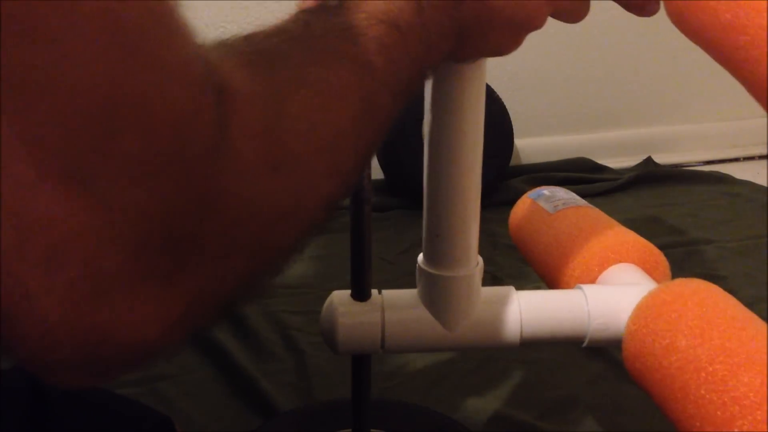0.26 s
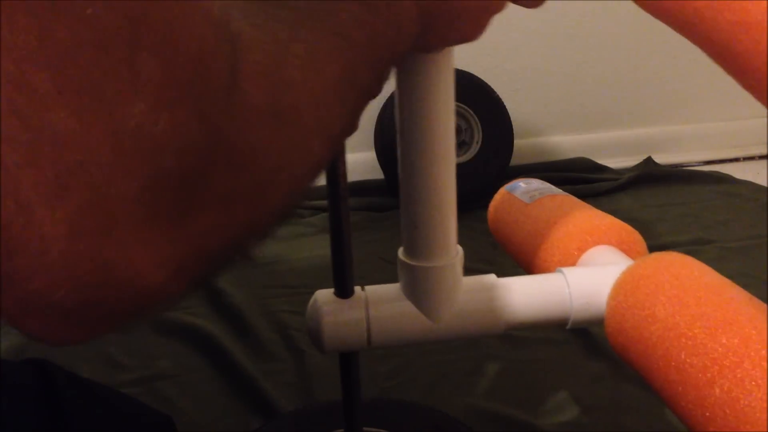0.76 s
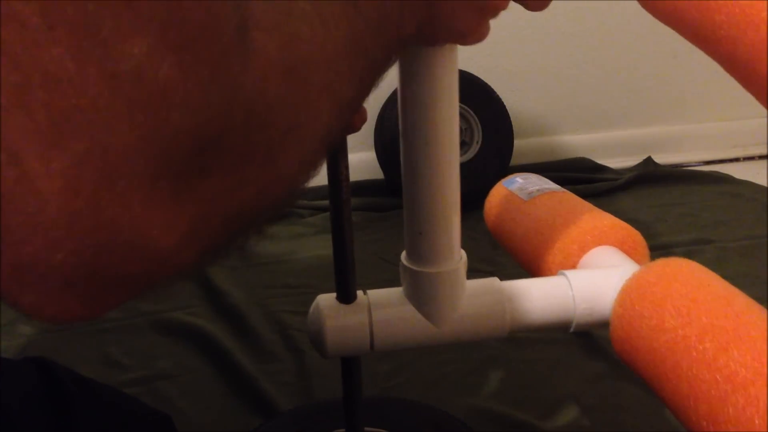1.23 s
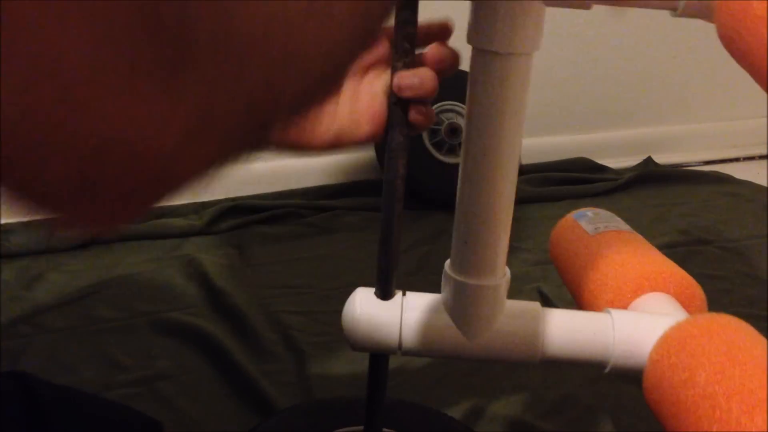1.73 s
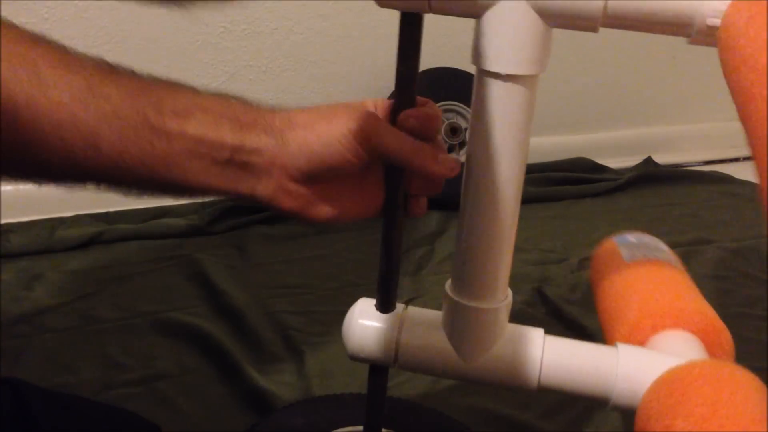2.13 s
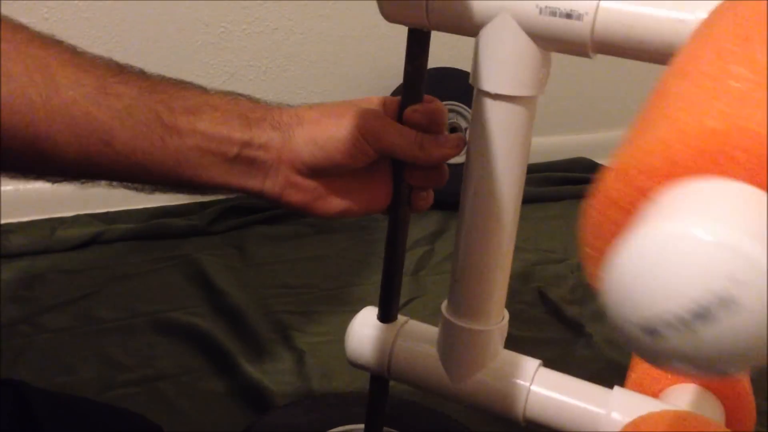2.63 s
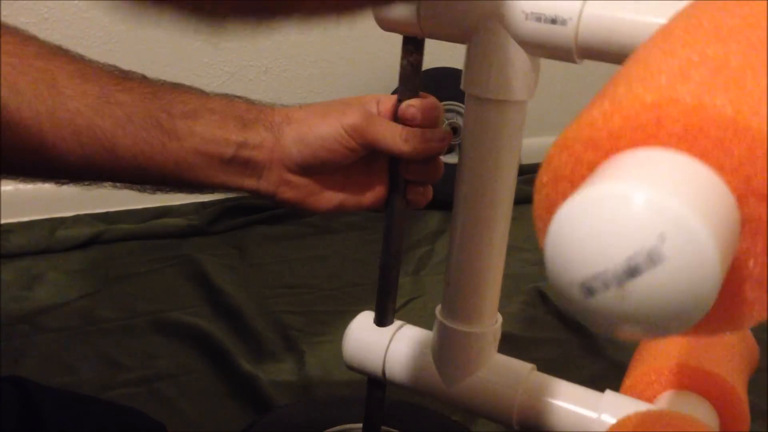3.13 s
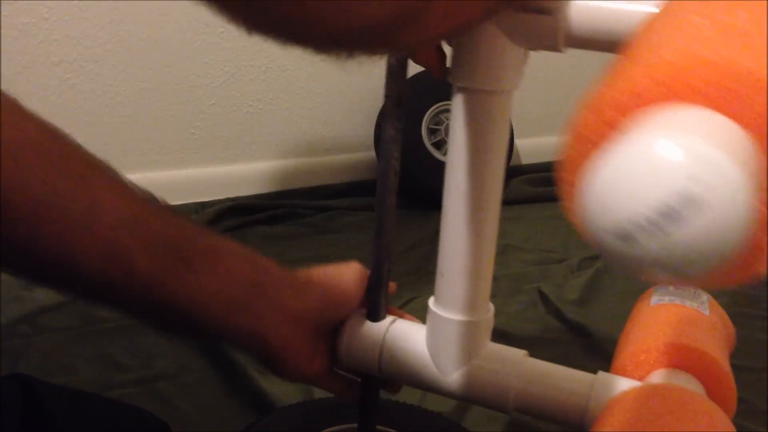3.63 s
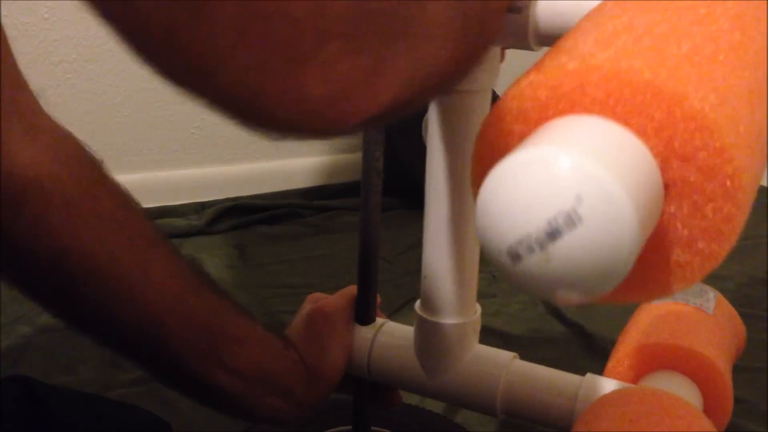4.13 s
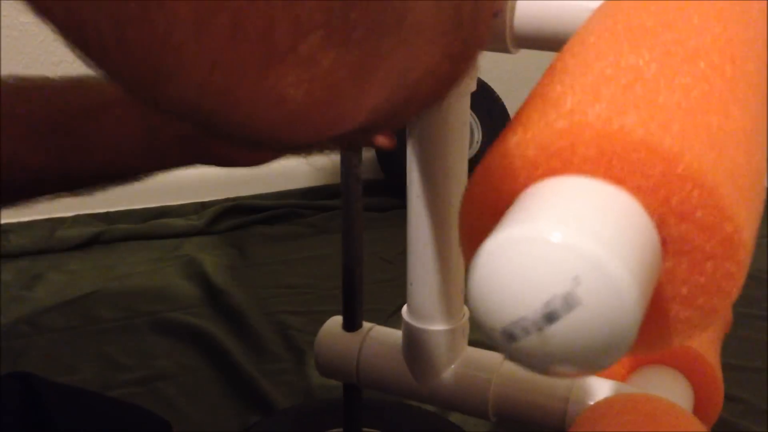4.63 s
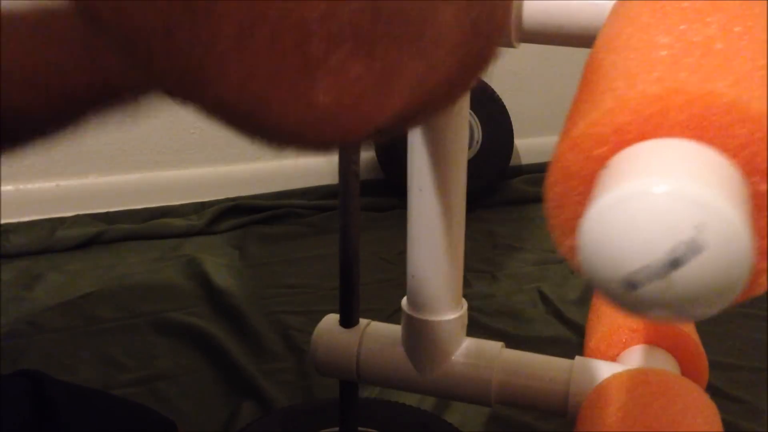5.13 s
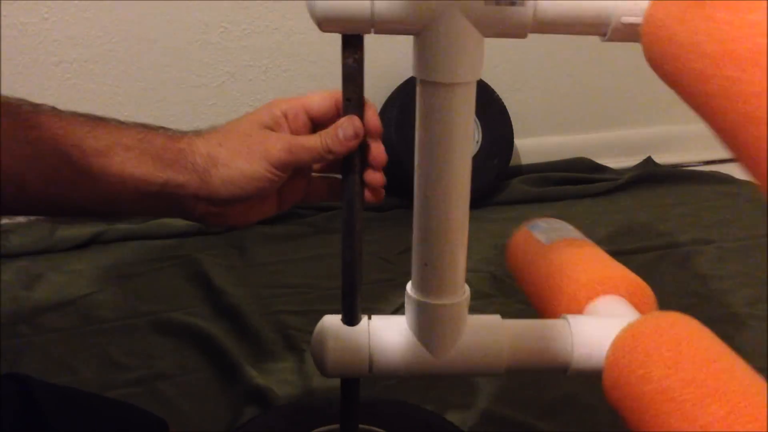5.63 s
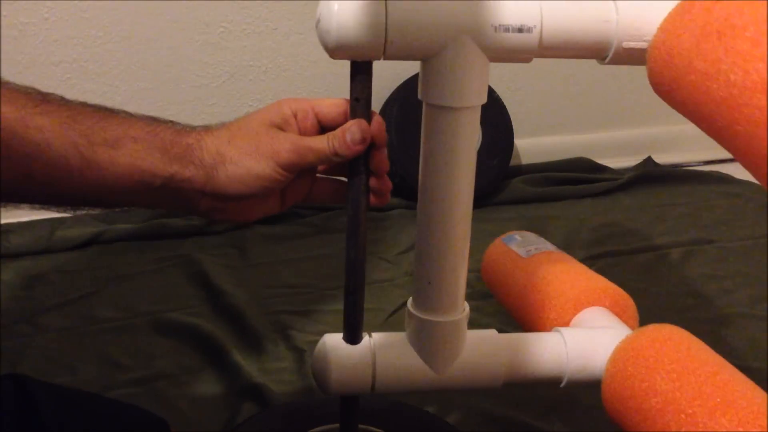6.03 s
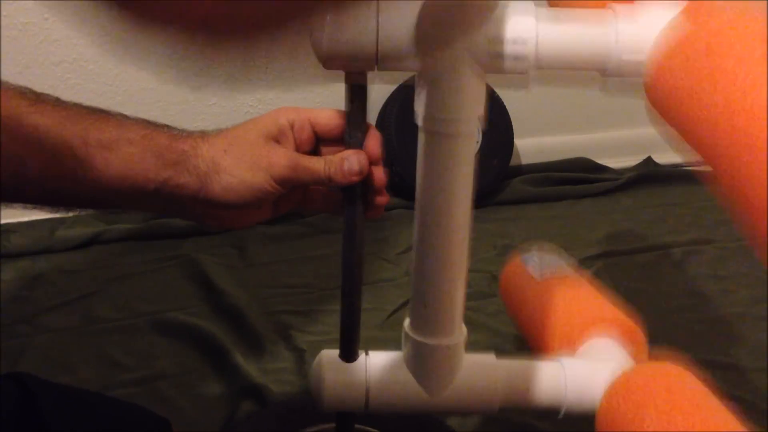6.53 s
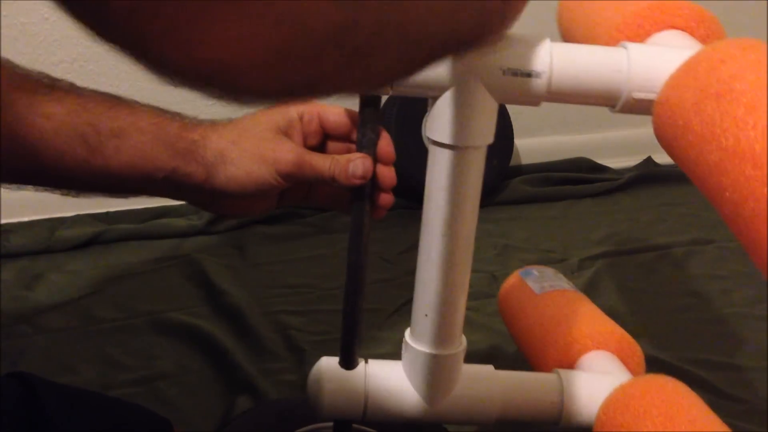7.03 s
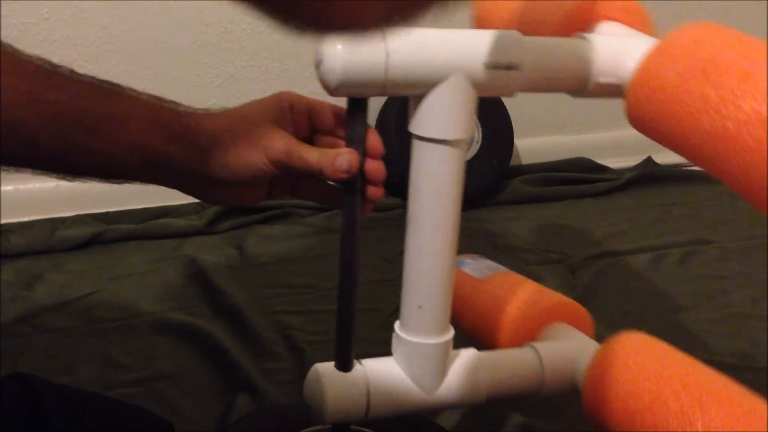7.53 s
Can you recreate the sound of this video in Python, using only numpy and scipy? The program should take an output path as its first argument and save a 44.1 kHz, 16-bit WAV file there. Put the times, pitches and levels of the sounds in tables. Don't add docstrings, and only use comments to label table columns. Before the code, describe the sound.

Hollow plastic pipes struck by hand knock and ring as a metal rod cracks sharply in its hole, with rattles in a small room.

```python
import sys
import numpy as np
from scipy import signal
from scipy.fft import rfft, irfft, next_fast_len
from scipy.io import wavfile

SR = 44100
rng = np.random.default_rng(int(sys.argv[2]) if len(sys.argv) > 2 else 0)


def volts(x):
    e = np.asarray(x, float) / 20
    return 10 ** e


def dump(signal):
    limited = np.clip(np.atleast_2d(signal).T, -1, 1)
    pcm = np.round(limited * 32767).astype(np.int16)
    wavfile.write(sys.argv[1], SR, pcm)


N = 342657


def at_hz(points, hz):
    return np.interp(np.log(hz), np.log(np.array(points)[:, 0]), np.array(points)[:, 1])


def rms_one(x):
    return x / np.sqrt(np.mean(x ** 2) + 1e-20)


def add(track, start_s, sound):
    i = round(start_s * SR)
    track[i:i + len(sound)] += sound[:N - i]


def ring(clicks, hz, t60):
    radius, turn = volts(-60 / (t60 * SR)), 2 * np.pi * hz / SR
    feedback = [1, -2 * radius * np.cos(turn), radius * radius]
    return signal.lfilter([0, np.sin(turn)], feedback, clicks + 1e-18)


# start_s, level_db (peak of the long pipes), cross_piece_db and short_arm_db (against
# the long pipes), hardness_db
BLOWS = [
    (2.225, -9, -13.5, -0.5, -1.5),
    (2.604, -14.5, -2.5, -4.5, -8),
    (3.059, -15, -7, -8.5, -8),
    (5.82, -17, -0.5, 1, -0.5),
    (6.238, -14, 0, -16, -5),
    (6.688, -17, -18.5, -11, -6.5),
    (7.065, -19.5, 2, -6.5, -1),
    (7.463, -19.5, -4, -9.5, 1),
]
REBOUNDS = [
    (2.243, -14.5, -12, -11, -3),
    (5.828, -15, 4, -6.5, -10),
    (6.249, -18.5, 0, -9.5, -17),
    (6.7, -29.5, -2.5, -6, -17),
    (6.731, -29, -21, 0, -8),
    (6.741, -27.5, 7, 0, -10.5),
    (6.75, -38, 8, -7, -20),
]
# pitch_hz of deep, long pipes, cross piece, short arm, wall, hardness
BLOW_HZ = [200, 290, 450, 620, 1200, 2400]
# pitch_hz, level_db, t60_s
PIPE_TONES = [(141.1, -25.5, 0.04), (190, -20.5, 0.046), (235, -8.5, 0.25), (285, -2.5, .06), (320.6, 0, 0.11),
              (358.8, 2.5, .06), (446.5, 0.5, 0.071), (520, 1, 0.11), (610, 4, 0.12), (705.4, 0.5, 0.08),
              (844, 4, .04), (983.3, 1.5, 0.08), (1186.4, -2, 0.11), (1370, -4, 0.068), (1460, 0, .04),
         (1610, -4, .03), (1790, -3.5, 0.034), (1912, -3.5, 0.024), (2325, -1, 0.03), (2587, -4, 0.06),
         (3137, -14, .015)]


def pipes(level_db, spread_db, blur):
    blow_wall_db, rebound_wall_db = -7, 7
    far_dull_hz = 4000
    tones = PIPE_TONES
    hits = [(*b, blow_wall_db) for b in BLOWS] + [(*r, rebound_wall_db) for r in REBOUNDS]
    rows, near, far = np.array(hits), np.zeros(N), np.zeros(N)
    start_s, peak_db = rows[:, 0], rows[:, 1]
    luck = rng.standard_normal((len(rows), len(tones)))
    signs = rng.choice([-1, 1], luck.shape)
    deep_db = np.interp(start_s, *np.transpose(RATTLES)[[0, 2]])
    for k, (hz, tone_db, t60) in enumerate(tones):
        colour_db = []
        for (_, _, cross, arm, hard, wall), deep in zip(rows, deep_db):
            colours = [deep, 0, cross, arm, hard + wall, hard]
            colour_db.append(np.interp(np.log(hz), np.log(BLOW_HZ), colours))
        at = ((start_s + .4 / hz) * SR).astype(int)
        clicks = np.zeros(N)
        clicks[at] = signs[:, k] * volts(peak_db + colour_db + tone_db + level_db + spread_db * luck[:, k])
        near += ring(clicks, hz, t60)
        far += ring(clicks, hz, t60 / blur) * np.sqrt(blur / (1 + (hz / far_dull_hz) ** 2))
    return near, far


def contacts(events, width):
    near, far, t_ms = np.zeros(N), np.zeros(N), np.arange(4400) / SR * 1000
    for (start_s, peak_db, hz, ms), noise in zip(events, rng.standard_normal((len(events), len(t_ms)))):
        edges = [hz / width, min(hz * width, .4 * SR)]
        band = signal.butter(2, edges, "band", fs=SR, output="sos")
        band = np.vstack([band, band[:1]])
        swell = np.exp(-t_ms / ms) * (1 - np.exp(-t_ms / ms / 0.57))
        burst = signal.sosfilt(band, noise * swell)
        burst = volts(peak_db) * burst / np.abs(burst).max()
        click = signal.sosfilt(band, t_ms == 0)
        add(near, start_s, burst)
        add(far, start_s, click * np.sqrt(np.sum(burst ** 2) / np.sum(click ** 2)))
    return near, far


# start_s, level_db (peak), pitch_hz (colour), slip_ms (slip before the crack),
# knock_db (dull knock after it, against the crack)
JOLTS = [
    (2.2215, -13, 8000, 3.1, 6),
    (2.6030, -6, 12090, 1.2, 0.5),
    (3.0587, -3.5, 8000, 2.47, -3.5),
    (5.8175, -4, 9350, 1.75, 0.5),
    (6.2389, -12, 5500, 2.9, 6),
    (6.6865, -21, 4330, 3.4, -5.5),
    (6.7408, -26, 6000, 13, 1),
    (7.0647, -17, 5500, 4.5, 4),
    (7.4636, -18.5, 4500, 5.2, 2.5),
]
# start_s, level_db (peak), pitch_hz (colour)
BOUNCES = [(2.2212, -11.5, 5990), (2.6035, -6.5, 6900), (2.6103, -17, 10080), (4.8734, -51.5, 5300),
           (.051, -45, 5540), (5.8427, -9, 7300), (6.272, -39, 6500), (6.7006, -31, 7040),
           (6.7372, -25, 3050), (6.7460, -29, 6370), (7.7035, -46, 4000)]


def cracks():
    crack_cycles = 6.5
    slip_db, slip_hz, slip_lasts = -12, 8000, .75
    slip_low_db, slip_low_hz = -3, 1600
    touch_lead_s, touch_db, touch_hz, touch_ms = .0115, -41.5, 4000, 2.5
    knock_lag_s, knock_hz, knock_ms = .00105, 2900, 1.3
    events = [(s, db, hz, 1000 * crack_cycles / hz) for s, db, hz, *_ in JOLTS + BOUNCES]
    for s, db, _, lead_ms, dull_db in JOLTS:
        slip_s, slip_ms = s - lead_ms / 1000, slip_lasts * lead_ms
        events.append((slip_s, db + slip_db, slip_hz, slip_ms))
        events.append((slip_s, db + slip_db + slip_low_db, slip_low_hz, slip_ms))
        events.append((s - touch_lead_s, db + touch_db, touch_hz, touch_ms))
        events.append((s + knock_lag_s, db + dull_db, knock_hz, knock_ms))
    return contacts(events, width=1.9)


# start_s, level_db (near 280 Hz), deep_db, hollow_db, bright_db
RATTLES = [
    (2.223, -12.5, -6, 9.5, -0.5),
    (2.604, -14, -2, -0.5, 6),
    (3.059, -15, -5.5, -3, 10),
    (5.82, -16, -12, 6.5, 13),
    (5.841, -23, -1.5, -6, 14.5),
    (6.237, -15, -2, 1.5, 3.5),
    (6.689, -17.5, 0, 1, -2),
    (6.740, -24.5, -5, -4.5, -11),
    (7.066, -12.5, 7, -7.5, -2),
    (7.463, -15.5, 7.5, -3.5, -1.5),
]
RATTLE_HZ = [120, 280, 650, 1500, 4000, 10000, 16000]
RATTLE_DB = np.array([-27.5, 0, 0, -3.5, -7.5, -13, -26])
DEEP = np.array([0.73, 0.14, 0.076, 0.022, 0, 0, 0.079])
HOLLOW = np.array([0.16, 0, 0.51, 1, 0.11, 0.092, 0.02])
BRIGHT = np.array([0, 0.032, 0.42, .1, .55, 0.94, 1])


def rattles(level_db):
    out, hz = np.zeros(N), np.maximum(np.fft.rfftfreq(512, 1 / SR), 1)
    for start_s, low_db, deep_db, hollow_db, bright_db in RATTLES:
        shape = RATTLE_DB + deep_db * DEEP + hollow_db * HOLLOW + bright_db * BRIGHT
        band_db = np.interp(np.log(hz), np.log(RATTLE_HZ), shape)
        per_hz_db = low_db + band_db - 10 * np.log10(hz / RATTLE_HZ[1])
        click = np.roll(irfft(volts(level_db + per_hz_db)), 256) * np.hanning(512)
        add(out, start_s - 256 / SR, click)
    return out


def thuds():
    thud_ms, thud_db = 5.0, -33.5
    out = np.zeros(N)
    for start_s, db, *_ in RATTLES:
        add(out, start_s, volts(db + thud_db) * np.hanning(int(thud_ms * SR / 1000)))
    return out


# start_s, level_db (peak), pitch_hz (colour), length_ms
NUDGES = [(.050, -49, 623, 7.5), (.052, -47, 1980, 5.1), (.590, -60, 410, 9), (.960, -54, 557, 3.6),
          (1.060, -59, 460, 10), (1.417, -47, 474, 9.8), (1.466, -56, 530.4, 9), (1.615, -53.5, 530, 9.5),
          (1.720, -58, 310, 6.7), (1.820, -56.5, 3480, 14), (1.960, -57, 455, 9.9), (4.120, -60, 1886, 4.3),
          (5.480, -59, 4900, 43), (4.703, -49, 452, 8.0), (4.703, -50.5, 1300, 7.9),
          (4.840, -55.5, 4940, 37), (4.80, -60.5, 1600, 60), (4.71, -61, 3510, 8.4),
          (5.325, -57.5, 1257, 9.2), (5.39, -61.5, 1493, 30), (4.47, -63.5, 1193, 25),
          (7.703, -61.5, 2460, 3.8)]


def nudges():
    return contacts(NUDGES, width=1.4)


# pitch_hz, t60_s
ROOM_T60 = [(100, 0.45), (260, 0.22), (700, 0.25), (1500, 0.29), (2500, .25), (4850, 0.24), (12800, .14)]


def reflections(gap_ms, build_ms):
    t, edges = np.arange(SR // 2) / SR, 70 * 2 ** np.arange(0, 8.1, .5)
    white, tail = rng.standard_normal((2, len(t))), 0
    rise = 1 - np.exp(-np.maximum(t * 1000 - gap_ms, 0) / build_ms)
    for k, (low, high) in enumerate(zip(edges, edges[1:])):
        band = signal.sosfilt(signal.butter(2, [low, high], "band", fs=SR, output="sos"), white[k % 2])
        band = band * rise * volts(-60 * t / at_hz(ROOM_T60, np.sqrt(low * high)))
        tail = tail + band * np.sqrt((high - low) / np.sum(band ** 2) / (SR / 2))
    return tail


def room(x):
    out, step = np.zeros(N), 18300
    for i in range(-2500, N, step):
        start = max(i, 0)
        echoes = reflections(gap_ms=1.7, build_ms=0.7)
        add(out, start / SR, signal.fftconvolve(x[start:i + step], echoes))
    return out


# start_s, level_db (peak), pitch_hz
DRIPS_LOW = [(0.0348, -50, 2040), (0.2494, -61, 2360), (0.4743, -58, 1710), (0.4853, -57, 1600),
             (0.5656, -55.5, 1790), (0.9398, -51, 1990), (1.1857, -55.5, 1790), (1.2376, -57, 2848),
             (1.3862, -53, 1480), (1.475, -59, 2010), (1.6644, -59, 1500), (1.7394, -56.5, 2230),
             (1.8594, -58, 2710), (2.0487, -54.5, 2190), (2.9844, -61, 1836), (3.2665, -56, 1227),
             (3.3538, -50.5, 1783), (4.0143, -56, 1470), (4.3121, -55, 2390), (4.4363, -57, 2006),
             (4.5281, -57.5, 2224), (5.2495, -62, 2080), (5.4784, -57.5, 1700), (5.7029, -59.5, 2100),
             (6.0644, -58.5, 1583), (6.1644, -60, 1896), (6.3894, -53.5, 1730), (6.5294, -61, 1580),
             (6.912, -51, 872), (7.7034, -58, 1750)]
DRIPS_HIGH = [(0.074, -52, 4930), (0.1885, -59, 5400), (0.3726, -54.5, 4880), (0.4494, -59, 4780),
              (0.6614, -56, 5010), (1.2655, -57, 4700), (1.5994, -59, 4960), (1.6794, -59, 5500),
              (1.9914, -57, 4820), (2.8194, -63.5, 4980), (3.4494, -59.5, 5500), (4.25, -61.5, 4750),
              (4.4872, -55.5, 4830), (5.071, -61.5, 5500)]


def drips(events, cycles, rise):
    out, t = np.zeros(N), np.arange(3000) / SR
    for start_s, peak_db, hz in events:
        fade = np.exp(-t * hz / cycles) * (1 - np.exp(-t * hz / 1.5))
        add(out, start_s, volts(peak_db - 1) * fade * np.sin(2 * np.pi * hz * t * (1 + rise * t)))
    return out


def trickle(level_db, per_s):
    sizes = (rng.random(N) < per_s / SR) * volts(1.3 * rng.exponential(1, N).clip(0, 4))
    pitches, dealt = np.geomspace(1300, 5600, 14), rng.integers(0, 14, N)
    bubbles = sum(ring(sizes * (dealt == k), hz, 60 / hz) for k, hz in enumerate(pitches))
    return volts(level_db) * rms_one(bubbles)


def coloured(spectrum):
    size = next_fast_len(N)
    hz = np.maximum(np.fft.rfftfreq(size, 1 / SR), 1)
    white = rng.standard_normal(size)
    return rms_one(irfft(rfft(white) * volts(at_hz(spectrum, hz)), size)[:N])


def arm_swing():
    t, swing_s = np.arange(N) / SR, .012
    return sum(np.exp((t - s) / swing_s * (t < s)) * (t < s) for s, *_ in JOLTS).clip(0, 1)


# start_s, level_db
HANDS = [(0, -73.5), (1.27, -78), (2.18, -73.5), (2.9, -81), (3.35, -70.5), (3.56, -81), (4.08, -84),
         (4.44, -81), (4.65, -75), (5.5, -76.5), (6.12, -82), (7.77, -80)]
# pitch_hz, level_db (per Hz)
RUSTLE = [(900, -31.5), (2000, -7.5), (3800, -7), (4900, 3), (6000, -3.5), (9000, -10), (15000, -15)]


def rustle(swing):
    t = np.arange(N) / SR
    knots = N // 1300 + 2
    flutter = np.interp(np.arange(N) / 1300, np.arange(knots), rng.standard_normal(knots))
    level_db = np.interp(t, *np.transpose(HANDS)) + 13.5 * swing + 3.5 * flutter
    return volts(level_db) * coloured(RUSTLE)


# pitch_hz, level_db (per Hz)
RUMBLE = [(20, -33.5), (60, -26), (100, -21.5), (150, -6.5), (240, -3), (400, -7.5), (750, -16),
          (1200, -22.5), (2500, -61)]


def rumble(swing):
    return volts(-67.5 + 13 * swing) * coloured(RUMBLE)


# pitch_hz, level_db (rms)
HUM = [(118.4, -77), (177.6, -78.5), (242.2, -78.5)]


def pump_hum():
    t = np.arange(N) / SR
    return sum(volts(db + 4.5) * np.sin(2 * np.pi * hz * t + k) for k, (hz, db) in enumerate(HUM))


# pitch_hz, level_db (per Hz)
HISS = [(410, -34.5), (700, -4.5), (854, -11), (1490, -7.5), (1610, -8.5), (2390, -5), (3700, -4.5),
        (4820, -5), (15200, -7.5), (15500, -35)]


def hiss():
    return volts(-66.5) * coloured(HISS)


def scene():
    frame, far_frame = pipes(level_db=-3.5, spread_db=0.3, blur=2.1)
    crack, far_crack = cracks()
    nudge, far_nudge = nudges()
    water = drips(DRIPS_LOW, cycles=9, rise=.8) + drips(DRIPS_HIGH, cycles=14, rise=.8)
    wet = volts(-2.0) * far_frame + rattles(level_db=38.5)
    wet = wet + volts(-13.0) * far_crack + volts(-5.0) * far_nudge + volts(6.5) * water
    near = frame + crack + nudge + water + room(wet)
    near = signal.sosfilt(signal.butter(6, 150, "high", fs=SR, output="sos"), near)
    swing = arm_swing()
    background = rumble(swing) + pump_hum() + trickle(level_db=-83.5, per_s=49) + rustle(swing)
    return (near + thuds() + background)[None]


def low_pass(x):
    return signal.sosfilt(signal.butter(12, 16830, fs=SR, output="sos"), x)


def record(dry):
    x = signal.sosfilt(signal.cheby2(10, 28, 15600, fs=SR, output="sos"), dry) + hiss()
    over_db = np.maximum(20 * np.log10(np.abs(x[0]) + 1e-9) + 21.84, 0)
    back_db = 8.1 * np.arange(N) / SR
    dip_db = 0.17 * (np.maximum.accumulate(over_db + back_db / .2) - back_db / .2)
    x = x * volts(-signal.lfilter([.0004], [1, -.9996], dip_db))
    return low_pass(np.clip(x, -.93, .93))


dry = scene()
out = record(dry)
dump(out)
```